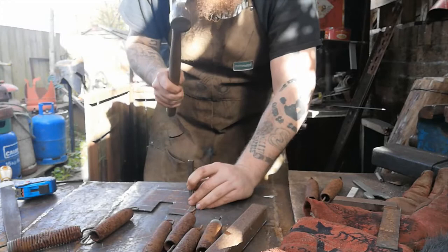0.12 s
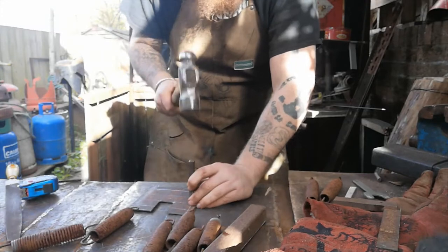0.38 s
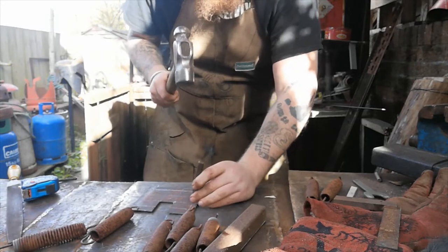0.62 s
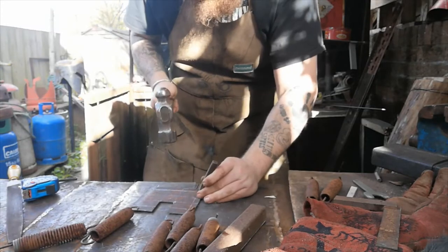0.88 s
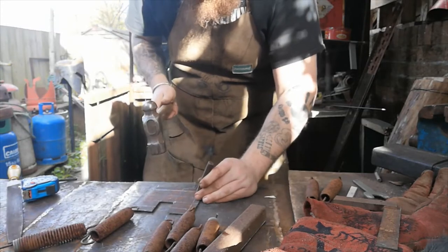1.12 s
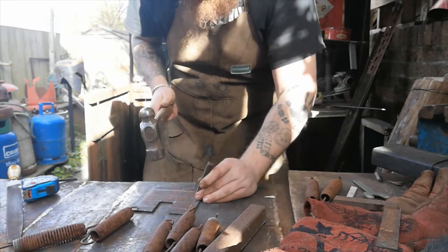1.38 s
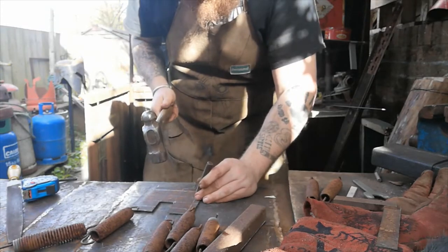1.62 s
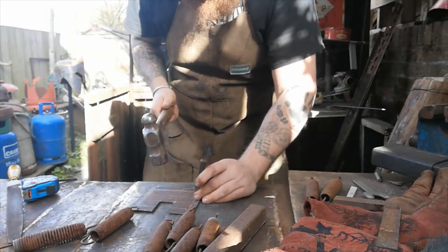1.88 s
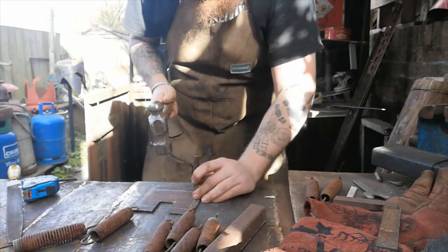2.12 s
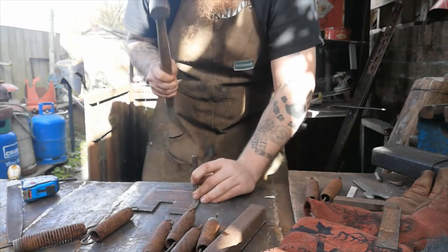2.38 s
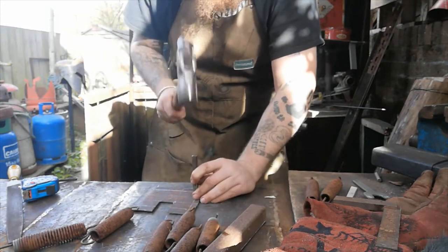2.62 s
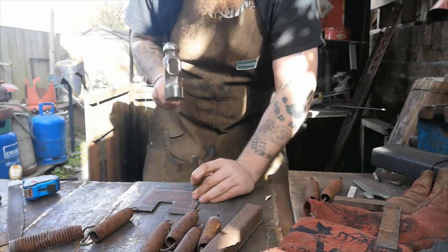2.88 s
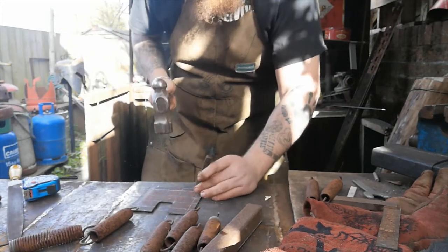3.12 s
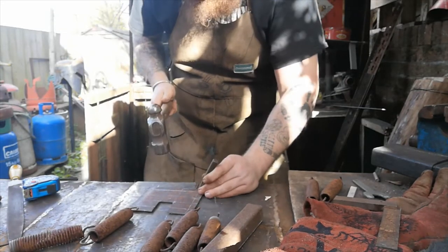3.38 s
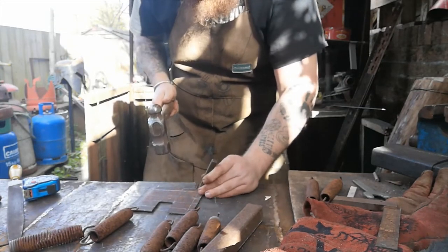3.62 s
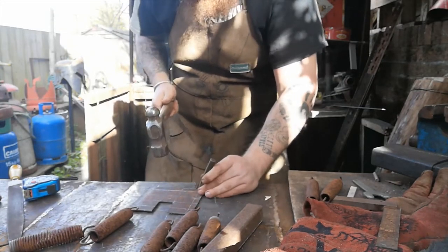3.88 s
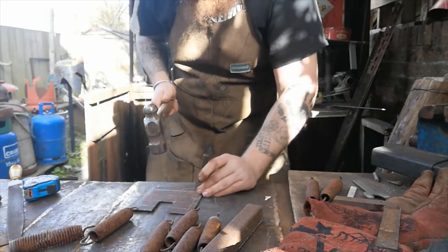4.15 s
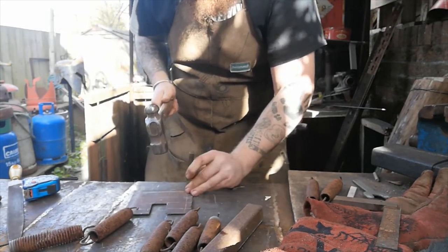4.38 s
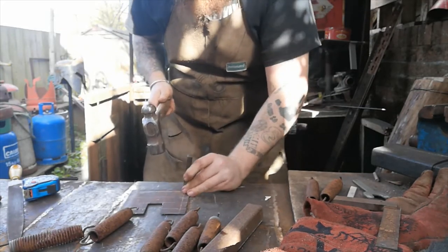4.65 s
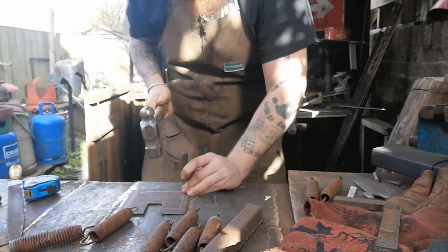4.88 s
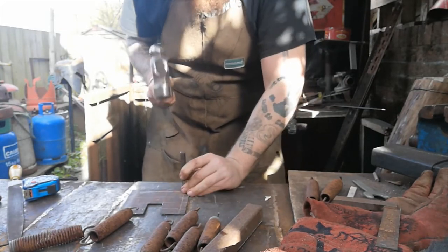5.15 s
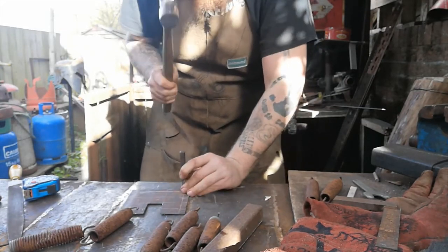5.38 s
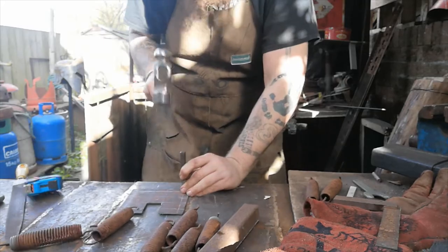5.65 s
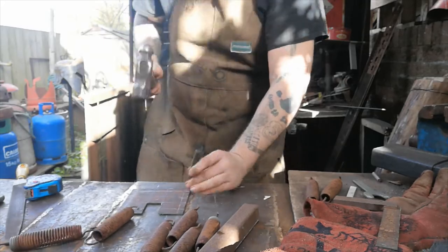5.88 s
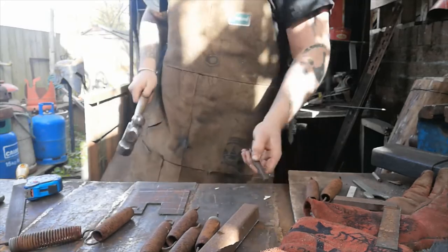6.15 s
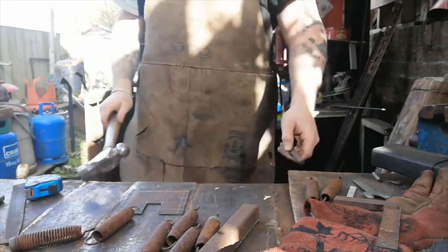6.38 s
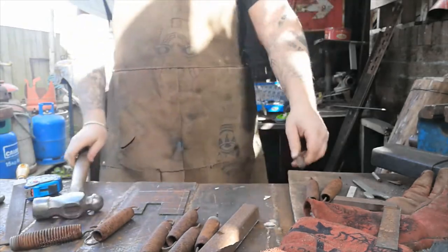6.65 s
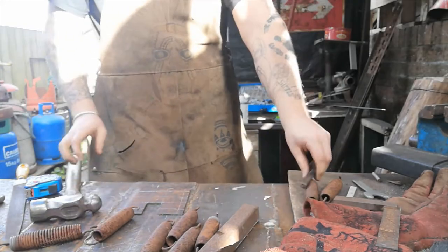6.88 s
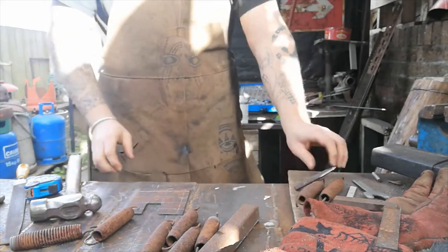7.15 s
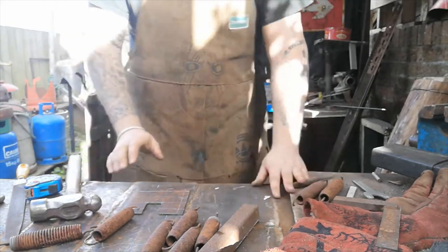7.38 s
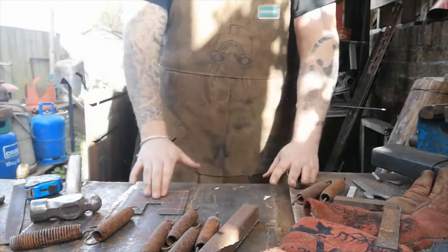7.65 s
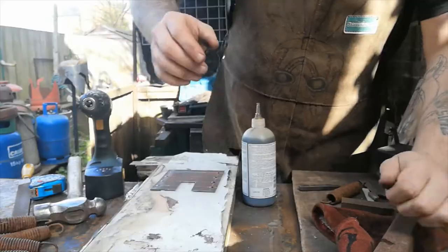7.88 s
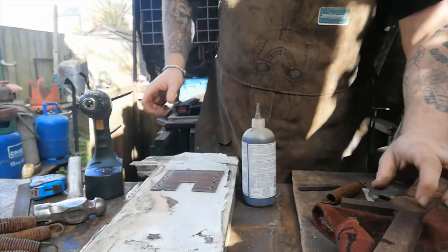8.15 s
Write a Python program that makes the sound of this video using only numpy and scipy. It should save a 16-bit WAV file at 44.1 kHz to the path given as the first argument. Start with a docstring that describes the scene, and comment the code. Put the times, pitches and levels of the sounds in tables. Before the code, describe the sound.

In a quiet open workshop, a hammer cracks a punch on steel three times; loose scrap rattles, tools are set down, then near silence.

```python
"""Hammer blows on a centre punch ring a steel bench; loose scrap rocks and rattles after each one. Steel
slides and clinks, tools are laid down; far traffic hums, a small bird whistles thinly. Near the end the
level falls close to silence, creeps up, then jumps back faintly. Bench, plate, punch, tool, board and scrap
are decaying modes set off by noise bursts or clicks; slides are filtered grit, yard and breeze shaped
noise, the bird a wavering sine."""
import sys
import numpy as np
from scipy import signal
from scipy.fft import rfft, irfft
from scipy.io import wavfile

SR = 44100
rng = np.random.default_rng(int(sys.argv[2]) if len(sys.argv) > 2 else 0)


def waveform_to_disk(signal):
    """Save audio, clipped to [-1, 1], as 16-bit WAV at the path in sys.argv[1]."""
    frames = np.transpose(np.atleast_2d(signal))
    scaled = np.clip(frames, -1, 1) * 32767
    samples = np.round(scaled).astype(np.int16)
    wavfile.write(sys.argv[1], SR, samples)


def ratio_of_db(decibels):
    """Turn decibels (scalar or array-like) into linear amplitude factors; 0 dB maps to 1."""
    return 10 ** (np.asarray(decibels, float) / 20)


N = 364707
TIME_S = np.arange(N) / SR

# hammer on punch: (time [s], level [dB], ring length share [1])
BLOWS = [(0.3743, -11, 0.92), (2.7482, -9.5, 0.88), (5.6207, -12.5, 1.246)]


def rms_one(x):
    """Scale to unit rms."""
    return x / np.sqrt(np.mean(x ** 2) + 1e-20)


def in_time(rows):
    """Interpolate each column over the scene; the first column is time."""
    s, *columns = np.transpose(rows)
    return [np.interp(TIME_S, s, column) for column in columns]


def at_hz(points, hz):
    """Interpolate (Hz, value) points over log frequency."""
    points_hz, values = np.transpose(points)
    return np.interp(np.log(hz), np.log(points_hz), values)


def drift(rate_hz):
    """Slow random wander of unit rms: noise through two equal poles, run at SR / 40."""
    r = np.exp(-2 * np.pi * rate_hz * 40 / SR)
    noise = rng.standard_normal(N // 40 + 2002)
    slow = signal.lfilter([1], [1, -2 * r, r * r], noise)[2000:]  # settled part
    return np.interp(np.arange(N) / 40, np.arange(len(slow)), rms_one(slow))


def bands(source):
    """Yield (centre Hz, third-octave slice), two source channels in turn; centres stop at 7 kHz."""
    edges_hz = 22 * 2 ** np.arange(0, 8.7, 1 / 3)
    for k, (low_hz, high_hz) in enumerate(zip(edges_hz, edges_hz[1:])):
        sos = signal.butter(2, [low_hz, high_hz], "band", fs=SR, output="sos")
        yield min(np.sqrt(low_hz * high_hz), 7000), signal.sosfilt(sos, source[k % 2])


def ring(clicks, hz, t60_s):
    """Two-pole mode: a unit click starts a decaying sine of height 1."""
    r, w = ratio_of_db(-60 / (t60_s * SR)), 2 * np.pi * hz / SR
    return signal.lfilter([0, np.sin(w)], [1, -2 * r * np.cos(w), r * r], clicks + 1e-18)


def resonate(x, hz, width_hz):
    """Resonance with about unit gain on top."""
    r = np.exp(-np.pi * width_hz / SR)
    poles = [1, -2 * r * np.cos(2 * np.pi * hz / SR), r * r]
    return signal.lfilter([(1 - r * r) / 2, 0, (r * r - 1) / 2], poles, x)


def metallic(shape, width_hz=30):
    """Noise through a crowd of narrow modes, about one every 70 Hz, of random strength."""
    white = rfft(rng.standard_normal(shape))
    hz = np.linspace(0, SR / 2, white.shape[-1])
    centres_hz = np.cumsum(rng.uniform(25, 115, 120))
    coarse_hz = hz[::max(len(hz) // 8000, 1)]
    modes = 1 / (1 + (2 * (coarse_hz[:, None] - centres_hz) / width_hz) ** 2)
    power = 0.1 + np.sum(rng.gamma(2, 0.5, 120) * modes, axis=1)
    return rms_one(irfft(white * np.sqrt(np.interp(hz, coarse_hz, power)), shape[-1]))


def grains(per_s, spread_db):
    """Two channels of random clicks of uneven size and sign."""
    sizes = ratio_of_db(spread_db * np.minimum(rng.exponential(1, (2, N)), 4))
    sizes = sizes * rng.choice([-1, 1], (2, N))
    return sizes * (rng.random((2, N)) < per_s / SR) + 1e-18


def surges(rows, rise_db_per_s, fall_db_per_s):
    """Gain that climbs to each (s, dB) top and falls from it in straight dB lines."""
    return sum(ratio_of_db(db - np.maximum(rise_db_per_s * (top_s - TIME_S), fall_db_per_s * (TIME_S - top_s)))
               for top_s, db in rows)


def yard():
    """Distant traffic and air: noise bands that wander a little, with a few wavering hums."""
    # noise density: (frequency [Hz], relative level [dB per Hz])
    colour = [(12, -32), (20, -5.5), (59, 4), (140, -2), (218, -1.5), (556, -9), (629, -13), (932, -12),
              (1350, -22.5), (3040, -30.5), (3800, -36), (7200, -28.5), (9360, -61), (15800, -120)]
    # overall level: (time [s], level [dB])
    level = [(0, -65.5), (.36, -64), (1.6, -59.5), (2.6, -62.5), (5.6, -61), (7.9, -57)]
    # hums: (frequency [Hz], width [Hz], relative level [dB])
    hums = [(82, 8.9, 1), (204, 7.2, 10), (270, 5, -5.5)]
    together_db, white = drift(1.4), rng.standard_normal((2, N))
    mix = np.zeros(N)
    for hz, band in bands(white):
        mix += ratio_of_db(at_hz(colour, hz) + together_db + 1.5 * drift(6)) * band
    for hz, width_hz, db in hums:
        mix += ratio_of_db(db + 3 * drift(3)) * resonate(white[0], hz, width_hz)
    return ratio_of_db(in_time(level)[0]) * rms_one(mix)


def clinks():
    """Handled punch: a tick and dying noise through tool modes, loudest near each clink's centre."""
    # faint clinks: (time [s], level [dB], centre [octaves above 1 kHz])
    events = [(0.302, -68, 4), (1.23, -67, 0.6), (1.789, -57, 0), (1.793, -62.5, 0.86), (1.919, -63.5, 1.9),
              (2.039, -67, 3), (2.259, -70, 2), (2.352, -65, 3), (2.447, -55.5, 0.3), (2.452, -71.5, 2),
              (2.509, -66, 3), (2.588, -68.5, 2.7), (2.656, -73, 2.5), (2.70, -79, 2.5), (3.64, -65.5, 3),
              (3.958, -57, 0.2), (3.96, -66.5, 2), (4.813, -58.5, 2.5), (4.885, -59.5, 1.9),
              (4.911, -58, 2), (6.479, -62, 2.5), (7.389, -60, 1.53), (4.38, -62.5, -0.5),
              (7.482, -52, -0.76), (7.685, -49.5, 2), (7.694, -37.5, 1.2)]
    # tool modes: (frequency [Hz], width [Hz], relative level [dB], t60 [s])
    tool = [(481, 120, 1.5, 0.3), (647.5, 280, 0, 0.44), (892.5, 200, 1, 0.55), (1750, 300, -6, .12),
            (2000, 120, -3.5, .2), (2403, 120, 0.5, 0.18), (3140, 360, -0.5, 0.25), (4160, 270, -5.5, .12),
            (5670, 640, -2.5, 0.17), (6800, 240, 2.5, 0.12)]
    fall_db_per_octave = 16
    t = np.arange(SR // 2) / SR
    out, puffs = np.zeros(N + len(t)), metallic((len(events), len(t)), width_hz=48)
    for (s, db, centre_octave), puff in zip(events, puffs):
        tone = 0.36 * puff * np.exp(-t / 0.004)  # tick
        for hz, width_hz, mode_db, t60_s in tool:
            away_db = fall_db_per_octave * abs(np.log2(hz / 1000) - centre_octave)
            mode = rms_one(resonate(resonate(puff, hz, width_hz), hz, width_hz))
            tone = tone + ratio_of_db(mode_db - away_db - 60 * t / t60_s) * mode
        out[round(s * SR):][:len(t)] += ratio_of_db(db) * tone
    return out[:N]


def blows():
    """Blow rows (s, dB, bass dB, middle dB, treble dB, ring share), all of one colour."""
    # blow colour, relative to the blow level: bass [dB], middle [dB], treble [dB]
    colour = (-13, -9, -8)
    return [(s, db, *colour, share) for s, db, share in BLOWS]


def knocks():
    """Knock rows, same columns: the colour is a slope from bass to treble with a raised middle."""
    # tools and scrap on the bench: (time [s], level [dB], treble over bass [dB], ring length share [1])
    events = [(0.489, -45.5, 15.5, 1), (0.619, -55.5, 0.5, 0.83), (1.897, -64.5, 12, 0.84),
              (1.943, -59.5, 17, 0.085), (2.824, -43, 7.5, 1), (2.949, -59.5, 13.5, 1),
              (3.525, -67, -19, .68), (4.117, -69.5, 21.5, 0.66), (4.524, -43.5, 7.5, .43),
              (5.931, -61, 10, 0.24), (5.981, -58, 1, 0.52), (6.636, -31, -1.5, 1),
              (6.677, -30.5, -3, 0.34), (6.696, -41.5, 15.5, 1), (6.738, -43.5, -6, 0.14),
              (6.889, -35, -8, 0.74), (7.132, -56.5, -25, 0.32), (7.161, -54.5, -27.5, 0.28),
              (7.247, -66, -29.5, 1), (7.525, -35, -19, 0.3), (7.693, -36, 14.5, 0.51)]
    middle_db = 6
    return [(s, db, -slope_db / 2, middle_db, slope_db / 2, share) for s, db, slope_db, share in events]


def colour_db(event, hz):
    """Level a contact gives at a frequency, from its bass, middle and treble."""
    s, level_db, bass_db, middle_db, treble_db, share = event
    colour = [(60, bass_db - 6.5), (300, bass_db), (1500, middle_db), (5000, treble_db)]
    return level_db + at_hz(colour, hz)


def cracks():
    """Bright noise burst as the hardened faces meet."""
    crack_db, decay_s = -4, 0.003  # level relative to the blow
    out, t = np.zeros(N), np.arange(SR // 10) / SR
    bright = signal.butter(2, [2400, 7400], "band", fs=SR, output="sos")
    for (s, level_db, share), noise in zip(BLOWS, rng.standard_normal((len(BLOWS), len(t)))):
        burst = signal.sosfilt(bright, noise * np.exp(-t / decay_s))
        out[round(s * SR):][:len(t)] += ratio_of_db(level_db + crack_db) * burst
    return out


def bench_ring(events):
    """Crowded modes of bench top and shed dying by band, with a short crack; lows build up slower."""
    # dense ring: (frequency [Hz], relative level [dB per Hz])
    colour = [(24, -43.5), (40, -8), (157, -2), (191, -1), (329, -7.5), (409, -5.5), (466, -8.5),
              (914, -9.5), (1160, -16), (2480, -14), (3830, -18.5), (6600, -8.5), (7200, -16.5),
              (9360, -45), (15800, -120)]
    # its decay before the ring share: (frequency [Hz], t60 [s])
    decay = [(40, .25), (90, 0.63), (160, 0.73), (420, 1.007), (1100, 0.63), (2900, 0.5), (7000, 0.35)]
    out, t = np.zeros(N), np.arange(int(1.5 * SR)) / SR
    clatter = drift(30)  # loose parts jump and land: all bands flicker together
    for hz, noise in bands(0.74 * metallic((2, N))):
        envelope = np.zeros(N + len(t))
        rise = 1 - np.exp(-t / (0.00036 + 0.38 / hz))
        for event in events:
            t60_s = at_hz(decay, hz) * max(event[5], 0.05)
            shape = ratio_of_db(-60 * t / t60_s) + 0.56 * np.exp(-t / 0.0098)
            at = round(event[0] * SR)
            envelope[at:at + len(t)] += ratio_of_db(colour_db(event, hz)) * rise * shape
        gain_db = at_hz(colour, hz) + 14.5 + 1.5 * clatter + 1.5 * drift(36)
        out += ratio_of_db(gain_db) * envelope[:N] * noise
    return out


def plate_lines(events):
    """Each contact strikes every standing mode with its own strength; a resting tool shortens the ring."""
    # lines out of the ring: (frequency [Hz], relative level [dB], t60 at full ring share [s])
    modes = [(194, -10, .27), (420, -4, .25), (603, -8, .3), (950, -12, .25), (1570, -16, .25),
             (2440, -13, .4), (2850, -15, .33), (3035, -15, .4), (3330, -16, .35), (4440, -15, .3),
             (4815, -6, .18), (5200, -9, .25), (5460, -12, .27), (5739, -15, .35), (6010, -12, .3),
             (6490, -11, .28), (6750, -8, .25), (6970, -12, .33)]
    t = np.arange(SR) / SR
    out, (hz, mode_db, t60_s) = np.zeros(N + SR), np.transpose(modes)[:, :, None]
    chance = rng.standard_normal((len(events), len(modes), 2))
    for event, draw in zip(events, chance):
        strength_db = colour_db(event, hz) + mode_db + 1.9 * draw[:, :1] - 5.5
        wave = np.sin(2 * np.pi * hz * (1 + 0.006 * draw[:, 1:]) * t)  # load shifts the pitch a little
        length_s = t60_s * np.clip(event[5], 0.05, 1) ** 1.3
        at = round(event[0] * SR)
        out[at:at + SR] += np.sum(ratio_of_db(strength_db - 60 * t / length_s) * wave, axis=0)
    return out[:N]


def punch():
    """One long mode of the steel rod, flickering in the moving hand."""
    # level at each blow [dB]
    level_db = [-63, -63, -72]
    clicks = np.zeros(N)
    clicks[[round(blow[0] * SR) for blow in BLOWS]] = ratio_of_db(level_db)
    return ratio_of_db(2 * drift(20)) * ring(clicks, hz=4265, t60_s=1.6)


def jolts():
    """Each blow shakes the microphone stand: one slow push and rebound."""
    jolt_db, jolt_s = -22, 0.0051  # level relative to the blow, time constant
    out, t = np.zeros(N), np.arange(SR // 4) / SR / jolt_s
    for s, level_db, share in BLOWS:
        out[round(s * SR):][:len(t)] += ratio_of_db(level_db + jolt_db) * t * (2 - t) * np.exp(1 - t)
    return out


def wooden_knocks():
    """Knocks also click the modes of a wooden board, more so the duller they are."""
    # board modes: (frequency [Hz], relative level [dB], t60 [s])
    board = [(482, -2, .08), (590, 3, 0.098), (695, 0.5, .08), (853, -2.5, 0.036), (1300, -11, 0.046),
             (2080, -22, 0.028)]
    clicks = np.zeros(N)
    for s, level_db, bass_db, middle_db, treble_db, share in knocks():
        clicks[round(s * SR)] = ratio_of_db(level_db + bass_db + 0.47 * (bass_db - treble_db) - 10)
    return sum((-1) ** k * ratio_of_db(db) * ring(clicks, hz, t60_s) for k, (hz, db, t60_s) in enumerate(board))


def slide_controls():
    """Gain and treble share in dB: each slide sets in, sags or swells, and dies when the steel stops."""
    # steel on steel: (start [s], length [s], level [dB], sag [dB per s], treble share [dB])
    strokes = [(0.801, 0.18, -66, 34, -4.5), (3.196, .13, -70.5, -49.5, -2), (3.33, 0.068, -68.5, 81, -2),
               (4.316, 0.093, -66, -90, -0.5), (4.424, 0.11, -42.5, 9, -2), (4.553, 0.14, -46.5, 51, -9),
               (6.737, 0.31, -31, 175.5, -3), (6.891, 0.1, -37.5, 66, -5), (7.28, 0.047, -58, -40, -1),
               (7.481, 0.038, -59.5, -50, -3), (7.538, 0.11, -50, 249, -3.5)]
    attack_s, release_s = 0.0062, 0.018
    gain, treble_db = 0, np.zeros(N)
    for start_s, length_s, db, sag_db_per_s, share_db in strokes:
        t = np.maximum(TIME_S - start_s, 0)
        held = ratio_of_db(db - sag_db_per_s * np.minimum(t, length_s))
        release = np.exp(-np.maximum(t - length_s, 0) / release_s)
        gain = gain + held * (1 - np.exp(-t / attack_s)) * release
        treble_db[TIME_S >= start_s] = share_db
    return gain, treble_db


def slides():
    """Dense grit under the moving steel sounds its resonances; pressure stutters."""
    # grit colour: (frequency [Hz], relative level [dB per Hz])
    colour = [(150, -19), (460, -0.5), (900, -2), (1700, -10.5), (3000, -4), (3800, -24), (5200, 1.5),
              (7000, -15.5)]
    # resonances: (frequency [Hz], width [Hz], relative level [dB])
    peaks = [(483, 82, 1.5), (2169, 81, -0.5), (2890, 330, -9), (4300, 59, -7), (6670, 500, 0)]
    gain, treble_db = slide_controls()
    grit = grains(1500, spread_db=-0.5)
    parts = [(hz, ratio_of_db(at_hz(colour, hz) + 1.8 * drift(20.6)) * band)
             for hz, band in bands(grit) if hz > 150]
    parts += [(hz, ratio_of_db(db + 2.65 * drift(4.9)) * resonate(grit[0], hz, width_hz))
              for hz, width_hz, db in peaks]
    low = rms_one(sum(part for hz, part in parts if hz < 4000))
    high = rms_one(sum(part for hz, part in parts if hz >= 4000))
    share = np.clip(ratio_of_db(treble_db), 0, 0.98)
    stutter = ratio_of_db(0.88 * drift(48))
    return gain * stutter * (1.28 * np.sqrt(1 - share ** 2) * low + share * high)


def rock_gain():
    """Each surge swells, drops fast, then fades; held down for 0.6 s ahead of each blow."""
    # surges of rocking scrap: (time [s], level [dB])
    tops = [(0.91, -44.5), (3.14, -46.5), (3.4, -51), (6.219, -48)]
    rise_db_per_s, drop_db_per_s, fade_db_per_s, tail_db = 30.5, 81, 23.5, -8
    tails = [(s, db + tail_db) for s, db in tops]
    gain = surges(tops, rise_db_per_s, drop_db_per_s) + surges(tails, drop_db_per_s, fade_db_per_s)
    for blow_s, *rest in BLOWS:
        before = (TIME_S < blow_s) & (TIME_S > blow_s - 0.6)
        gain = np.where(before, np.minimum(gain, ratio_of_db(-75)), gain)
    return gain


def rocking():
    """Uneven soft contacts ring the low resonances of the loose scrap."""
    # scrap modes: (frequency [Hz], width [Hz], relative level [dB])
    scrap = [(97, 21, -13), (153.6, 16, 1.5), (312, 51, -1), (484, 300, -1.5), (763, 570, -4),
             (1515, 2000, -48)]
    soft = signal.butter(1, [80, 700], "band", fs=SR, output="sos")
    touches = signal.sosfilt(soft, grains(400, spread_db=1.5))
    rings = sum(ratio_of_db(db) * np.sqrt(width_hz) * ring(touches[k % 2], hz, 2.2 / width_hz)
                for k, (hz, width_hz, db) in enumerate(scrap))
    return rock_gain() * rms_one(rings)


def bird():
    """Thin breathy whistle, far off: a near-sine of unsteady pitch and level."""
    # whistle: (time [s], pitch [Hz])
    pitch = [(1.5, 5500), (1.6, 6000), (1.69, 5750), (1.73, 6230), (1.85, 6470), (2.0, 6300), (2.07, 6850),
             (2.16, 6750), (2.24, 5850)]
    hz, = in_time(pitch)
    sounding = (TIME_S > pitch[0][0]) & (TIME_S < pitch[-1][0])
    phase = 2 * np.pi * np.cumsum(hz * (1 + 0.015 * drift(156))) / SR
    return sounding * ratio_of_db(-82 + 3.1 * drift(30)) * np.sin(phase)


def breeze():
    """Puffs of air on the microphone: lumpy noise at the very bottom."""
    # puffs: (time [s], level [dB])
    puffs = [(6.41, -56.5), (7.63, -64.5)]
    lowest = signal.butter(2, [20, 45], "band", fs=SR, output="sos")
    lumps = signal.sosfilt(lowest, rng.standard_normal(N))
    return surges(puffs, rise_db_per_s=42, fall_db_per_s=33) * rms_one(lumps)


def scene():
    """Sum all sources to one channel."""
    contacts = blows() + knocks()
    steel = clinks() + cracks() + bench_ring(contacts) + plate_lines(contacts) + punch() + jolts()
    return (yard() + steel + wooden_knocks() + slides() + rocking() + bird() + breeze())[None]


def low_pass(x):
    """Removes everything above the highest recorded frequency."""
    return signal.sosfilt(signal.butter(12, 8330, fs=SR, output="sos"), x)


def record(dry):
    """Fader, then a steep cut of the top."""
    # fader: (time [s], gain [dB])
    fader = [(0, 0), (7.86, -1.5), (7.895, -11), (7.915, -72), (8.2, -60.5), (8.21, -28.5), (8.27, -32)]
    faded = dry * ratio_of_db(in_time(fader)[0])
    steep = signal.cheby2(14, 55, 8006, fs=SR, output="sos")  # 55 dB down from 8006 Hz
    mix = signal.sosfilt(steep, faded)
    return low_pass(mix)


dry = scene()
out = record(dry)
waveform_to_disk(out)
```